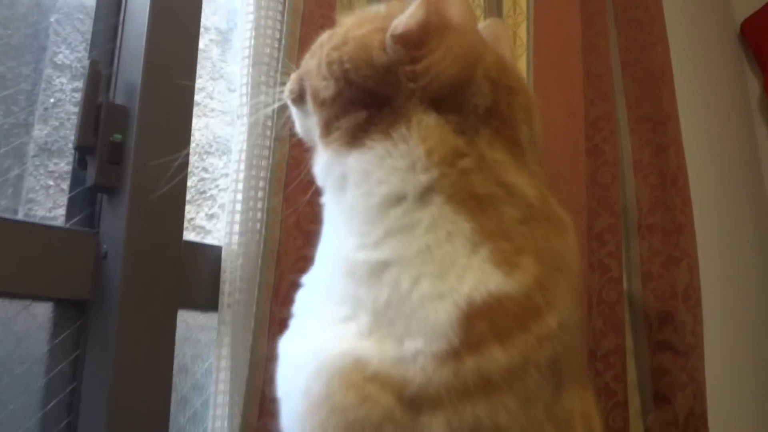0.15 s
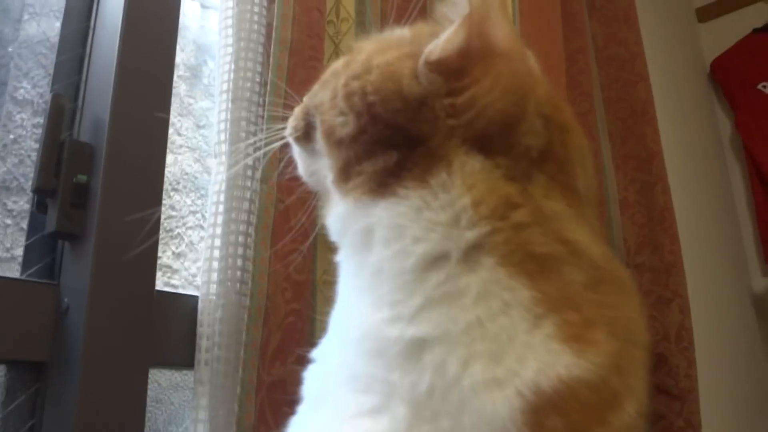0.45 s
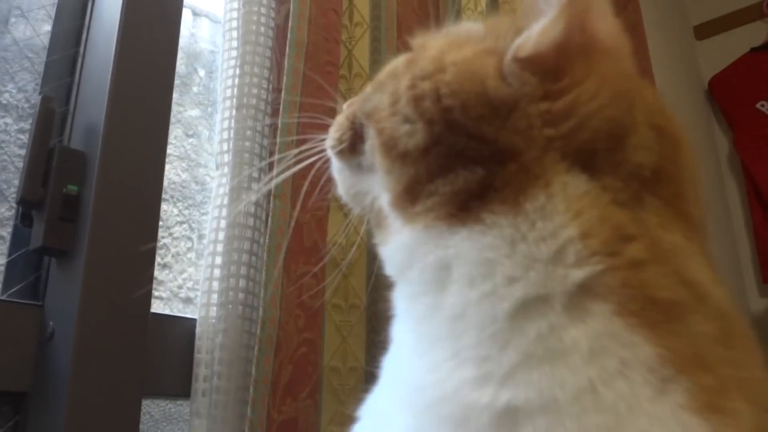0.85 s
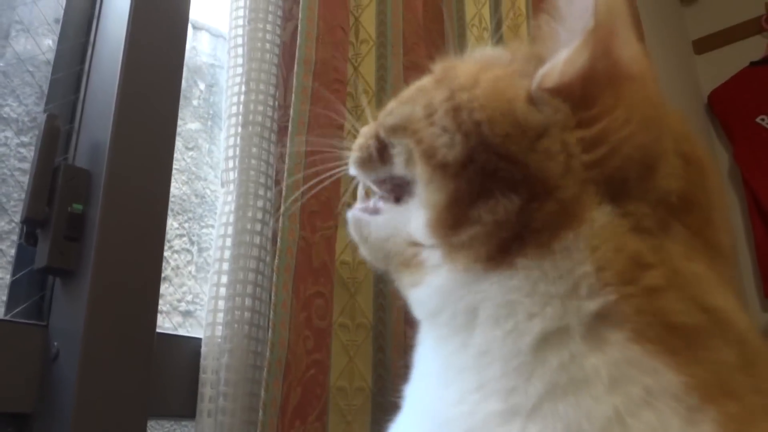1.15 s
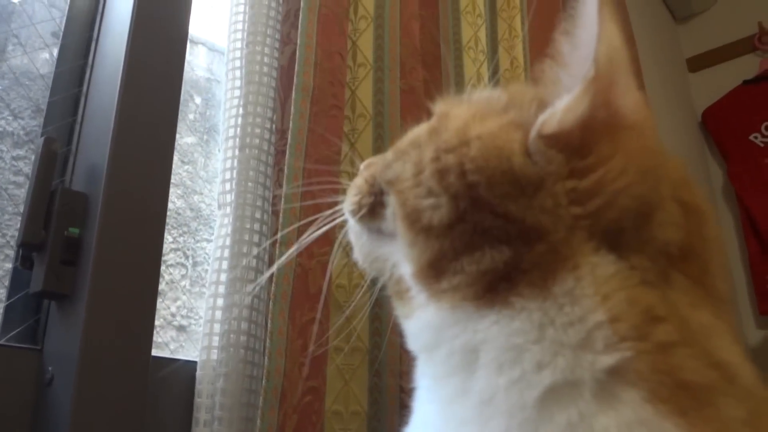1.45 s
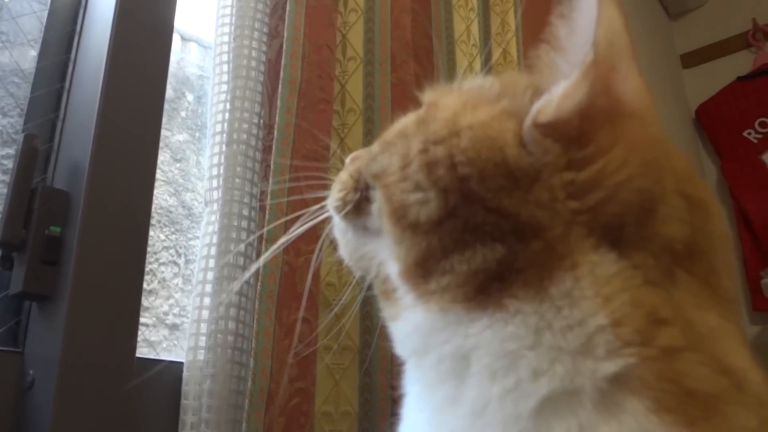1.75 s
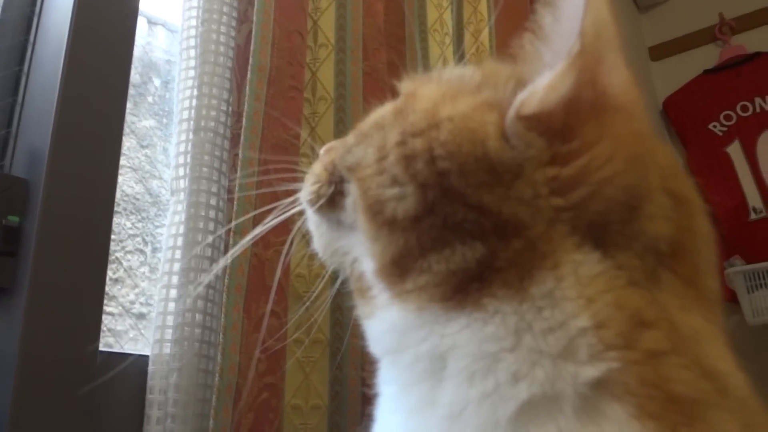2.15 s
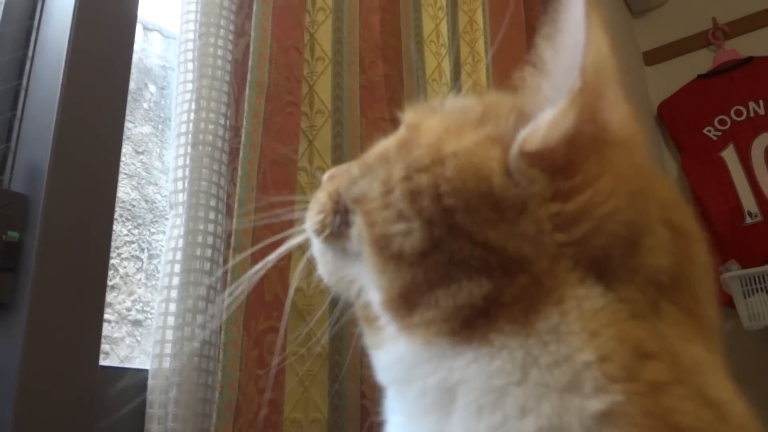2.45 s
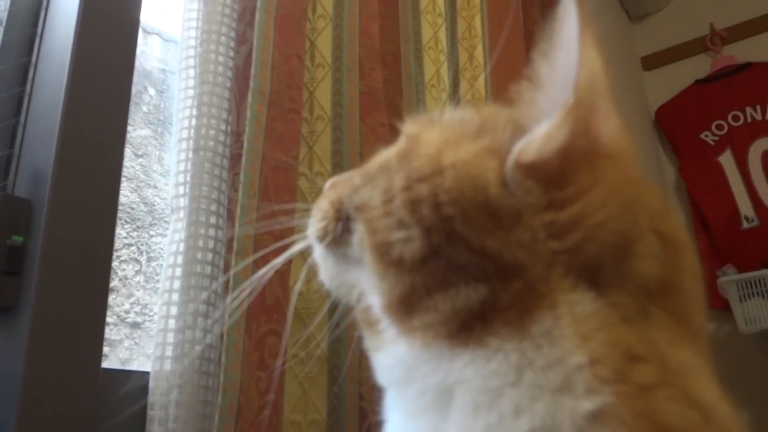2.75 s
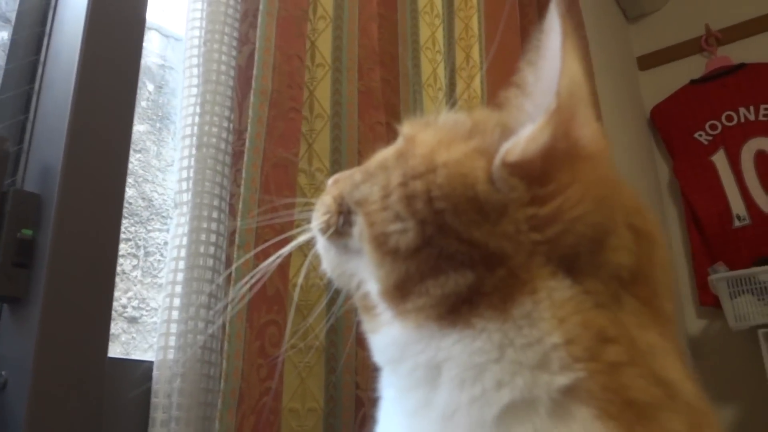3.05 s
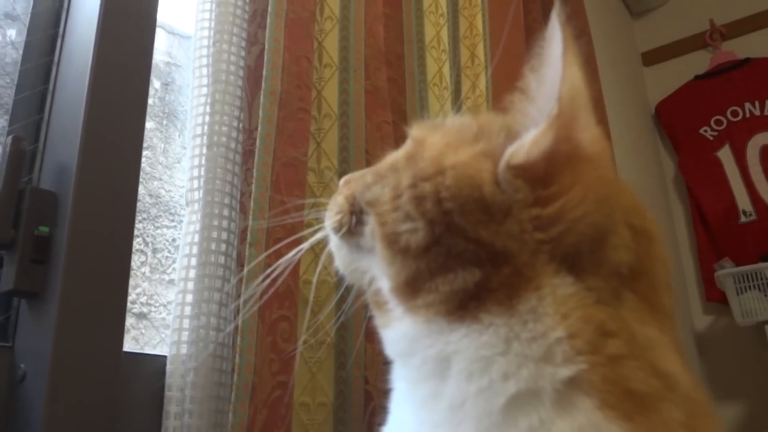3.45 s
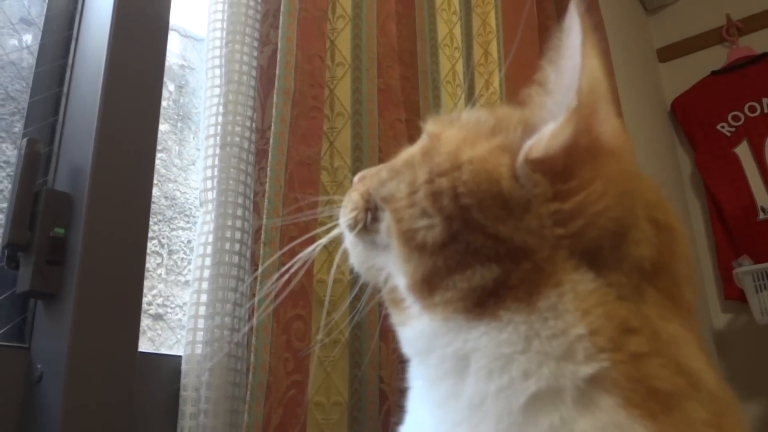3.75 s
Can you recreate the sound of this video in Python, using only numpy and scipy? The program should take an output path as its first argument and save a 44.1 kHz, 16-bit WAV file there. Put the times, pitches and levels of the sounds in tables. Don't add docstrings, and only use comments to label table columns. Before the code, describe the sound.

A cat's single short chirrup, a tenth of a second at about 1.2 s, starts clean, then flutters breathily, with a bright click inside it. Faint wet lip smacks open the clip; small taps follow at 0.15 and 0.4 s. Louder smacks come at 1.5 and 2.2 s, dull wooden knocks at 1.9 and, softer, 2.95 s. A deep thud at 3.55 s and last smack at 3.8 s end it, over steady traffic rumble and faint hiss.

```python
import sys
import numpy as np
from scipy import signal
from scipy.io import wavfile

SR = 44100
rng = np.random.default_rng(int(sys.argv[2]) if len(sys.argv) > 2 else 0)


def unload_wav(signal):
    wavfile.write(
        sys.argv[1],
        SR,
        np.round(np.clip(np.atleast_2d(signal).T, -1, 1) * 32767).astype(np.int16),
    )


def volts(x):
    e = np.asarray(x, float) / 20
    return 10 ** e


N = 171549


def in_time(rows):
    s, *columns = np.transpose(rows)
    return [np.interp(np.arange(N) / SR, s, c) for c in columns]


def at_hz(points, hz):
    table_hz, value = np.transpose(points)
    return np.interp(np.log(hz), np.log(table_hz), value)


def rms_one(x):
    return x / np.sqrt(np.mean(x ** 2) + 1e-20)


def dull(x, hz, order=2):
    return signal.sosfilt(signal.butter(order, hz, fs=SR, output="sos"), x)


def ring(x, hz, t60):
    r = volts(-60 / (t60 * SR))
    w = 2 * np.pi * hz / SR
    return signal.lfilter([0, np.sin(w)], [1, -2 * r * np.cos(w), r * r], x + 1e-18)


def bands(count, low_hz=22):
    warm_up = 4000
    white = rng.standard_normal((2, 2, count + warm_up))
    edges = low_hz * 2 ** (np.arange(29) / 3)
    for k, (low, high) in enumerate(zip(edges, edges[1:])):
        band_pass = signal.butter(2, [low, high], "band", fs=SR, output="sos")
        yield np.sqrt(low * high), signal.sosfilt(band_pass, white[k % 2])[:, warm_up:]


def traffic():
    # frequency in Hz, level in dB per Hz.
    spectrum = [(26, -36), (40, -16.5), (52, -19.5), (150, -13.5), (200, -17), (400, -21.5), (1400, -28.5),
                (3000, -36.5)]
    # time in seconds, level in dB.
    swell = [(0, 2.5), (.5, 2), (1.5, 1), (2.5, 1.6), (3.2, 1.65), (3.89, 1.5)]
    # frequency in Hz, likeness from -1 to 1.
    likeness = [(60, 0.73), (130, 0.89), (290, -0.25), (640, -0.28), (1410, -0.58), (3100, -0.08),
                (6800, -0.013)]
    # time in seconds, level in dB.
    pane_boom = [(0, -53.5), (.15, -62), (.35, -54.5), (.9, -52.5), (1.2, -54), (1.7, -51.5), (1.95, -53),
                 (2.1, -49), (2.3, -56.5), (2.45, -53.5), (3.0, -56.5), (3.7, -51.5), (3.89, -52.5)]
    tyre_hz, tyre_db, tyre_octaves = 874, 6, 0.37
    boom_hz, boom_width_hz = 80, 14
    road_db, left_db = -55.5, -0.3

    road = 0
    for hz, (mid, side) in bands(count=N):
        alike = np.clip(at_hz(likeness, hz), -1, 1)
        treble_loss_db = 9.7 * max(np.log2(hz / 3000), 0)
        tyre_hump_db = tyre_db * np.exp(-(np.log2(hz / tyre_hz) / tyre_octaves) ** 2)
        level = volts(at_hz(spectrum, hz) - treble_loss_db + tyre_hump_db)
        road = road + level * (np.sqrt(1 + alike) * mid + np.sqrt(1 - alike) * side * [[1], [-1]])
    swell_db, = in_time(swell)
    road = volts(road_db + swell_db) * rms_one(road)

    boom_t60 = np.log(1000) / np.pi / boom_width_hz
    mid, side = ring(rng.standard_normal((2, N + SR)), boom_hz, boom_t60)[:, SR:]
    boom = volts(in_time(pane_boom)[0]) * rms_one(mid + 0.073 * side * [[1], [-1]])
    return (road + boom) * volts([[left_db], [-left_db]])


def room(x):
    # frequency in Hz, reverberation time t60 in seconds.
    decay = [(100, 0.44), (500, 0.22), (1500, 0.19), (4000, 0.31), (9000, 0.1)]
    wide_above_hz = 420
    t = np.arange(SR // 2) / SR
    tail = 0
    for hz, pair in bands(count=len(t)):
        side_share = hz / (hz + wide_above_hz)
        tail = tail + pair * [[1], [side_share]] * volts(-60 * t / at_hz(decay, hz))
    tail = tail[0] + 1.13 * tail[1] * [[1], [-1]]
    tail = tail * np.clip(t / 0.0012, 0, 1)
    tail = tail / np.sqrt(np.sum(tail ** 2) / 2)
    return signal.fftconvolve(x[None], tail, axes=1)[:, :N]


def knocks():
    # start in seconds, peak level in dB, contact cut-off in Hz.
    blows = [
        (1.866, -26.5, 3650),
        (2.9493, -30.5, 1670),
    ]
    # frequency in Hz, level in dB, t60 in seconds.
    panel = [(128, -0.5, 0.085), (227.6, -13.5, .18), (303, -5, 0.05), (349, -13, 0.16), (446, -17, 0.21),
             (580, -13, 0.13), (670, -20, 0.028), (843, -9, 0.054), (1100, -6.5, 0.017),
             (1537, -5.5, 0.022)]
    # delay in seconds, level in dB.
    echoes = [(.0031, -4), (.0063, -3.5), (.0075, -3.5), (0.0138, -16), (.0238, -4.5)]
    crack_hz, crack_t60_s, crack_db, crack_lead_s = 2250, 0.0026, 3, 0.00045
    thump_hz, thump_t60_s, thump_db, thump_low_cut_hz = 505, 0.0068, 7, 250
    floor_cut_hz = 130

    out = np.zeros(N)
    for s, db, cut_hz in blows:
        blow = np.zeros(SR)
        blow[0] = volts(db)
        blow = dull(blow + 1e-18, cut_hz)
        late = np.roll(blow, int(crack_lead_s * SR))
        thump = volts(thump_db) * ring(late, thump_hz, thump_t60_s)
        body = thump - volts(crack_db) * ring(blow, crack_hz, crack_t60_s)
        for k, (hz, level_db, t60) in enumerate(panel):
            body += (-1) ** k * volts(level_db) * ring(late, hz, t60)
        reflected = thump - dull(thump, thump_low_cut_hz, order=1)
        for delay_s, echo_db in echoes:
            lag = int(delay_s * SR)
            body[lag:] += volts(echo_db) * reflected[:-lag]
        i = int(s * SR)
        out[i:i + SR] += body[:N - i]
    return out - dull(out, floor_cut_hz, order=1)


def taps():
    # start in seconds, peak level in dB, frequency in Hz, t60 in seconds.
    clicks = [
        (.152, -44.5, 920, 0.0091),
        (.405, -41, 225, 0.045),
        (1.1936, -27, 2040, 0.0045),
        (1.544, -52.5, 1330, 0.027),
        (3.566, -37, 80, 0.19),
    ]
    out = np.zeros(N)
    for s, db, hz, t60 in clicks:
        click = np.zeros(SR // 4)
        click[0] = volts(db)
        i = int(s * SR)
        out[i:i + len(click)] += ring(click, hz, t60)
    return out


def smacks():
    # start in seconds, peak level in dB, cavity frequency in Hz, left over right in dB.
    lip_clicks = [
        (0.0148, -46, 2360, -3),
        (0.049, -56, 2650, -6),
        (0.063, -50, 2390, -16),
        (0.0683, -53, 3270, -18),
        (1.4825, -33, 2370, 4),
        (2.1833, -39.5, 2470, 7),
        (3.5598, -51, 3330, -9),
        (3.8343, -42.5, 2500, 1.0),
    ]
    t60_s, rise_s, level_db = 0.0085, 0.0008, 6
    upper_hz, upper_db, upper_t60_s = 3750, -8, 0.028
    out = np.zeros((2, N))
    t = np.arange(SR // 30) / SR
    shape = (1 - np.exp(-(t / rise_s) ** 2)) * volts(-60 * t / t60_s)
    upper = volts(upper_db) * np.sin(2 * np.pi * upper_hz * t) * volts(-60 * t / upper_t60_s)
    for s, db, hz, pan_db in lip_clicks:
        tone = -np.sin(2 * np.pi * hz * t) - upper
        i = int(s * SR)
        out[:, i:i + len(t)] += volts(db + level_db) * shape * tone * volts([[pan_db / 2], [-pan_db / 2]])
    return out


def chirrup():
    # time in seconds, pitch in Hz, level in dB, mouth opening 0-1, roughness 0-1.
    call = [
        (1.1598, 887, -47.5, 0., 0.),
        (1.168, 880, -36, 0.14, 0),
        (1.173, 777, -34.5, 1, 0.13),
        (1.183, 772, -36.5, 1., 0.4),
        (1.187, 791, -42.5, 1., 0.65),
        (1.199, 784.5, -32, 0.72, 0.26),
        (1.205, 761, -58, 0.8, 1.1),
        (1.236, 740, -56.5, 0.08, 0.7),
        (1.256, 700, -72, 0., 0.45),
    ]
    # frequency in Hz, level in dB before this weighting.
    shut = [(600, 6.5), (900, 0.5), (1700, -2), (2600, -4.5), (3500, -5), (4400, -22), (8000, -25)]
    wide_open = [(800, -14), (1550, 0.), (2330, 3), (3100, 0.), (3900, -5), (4650, -17), (5450, -8),
                 (6200, -22)]
    # frequency in Hz, level in dB.
    air_colour = [(600, 4), (1400, -1.5), (2200, -3), (3400, 2), (4400, -13.5), (6800, -19), (10000, -32)]
    flutter_hz, flutter_depth, puff_db = 407, 0.67, 3.5

    on = slice(int(call[0][0] * SR), int(call[-1][0] * SR))
    hz, db, opening, rough = [column[on] for column in in_time(call)]
    opening, rough = np.clip(opening, 0, 1), np.clip(rough, 0, 1)
    phase = 2 * np.pi * np.cumsum(hz) / SR
    noise = rng.standard_normal((26, 4000 + SR // 5))
    wobble = dull(noise, flutter_hz)[:, 4000:4000 + len(hz)]
    wobble = wobble / wobble.std()

    voice, air = 0, 0
    for k in range(1, 13):
        colour = volts((3 - opening) * at_hz(shut, k * hz) + opening * at_hz(wide_open, k * hz))
        flutter = 1 - 0.48 * rough + flutter_depth * rough * 0.5 * wobble[k]
        voice = voice + colour * np.sin(k * phase) * flutter
        between = k + 0.5
        air = air + volts(at_hz(air_colour, between * hz)) * np.sin(between * phase) * wobble[13 + k]
    out = np.zeros(N)
    out[on] = volts(db) * (voice + volts(puff_db) * rough ** 2 * air)
    return out


def scene():
    cat, lips, wood = chirrup() + taps(), smacks(), knocks()
    cat_wet_db, smack_wet_db, knock_wet_db = -6.5, -22, -4
    wet = room(volts(cat_wet_db) * cat + volts(smack_wet_db) * lips.mean(axis=0) + volts(knock_wet_db) * wood)
    knock_pan_db, left_cut_hz = -1, 1300
    left = volts(knock_pan_db / 2) * dull(wood, left_cut_hz, order=1)
    right = volts(-knock_pan_db / 2) * wood
    return cat * volts([[-0.3], [0.3]]) + lips + np.array([left, right]) + wet + traffic()


def band_limit(x):
    return signal.sosfilt(signal.butter(12, 15800, fs=SR, output="sos"), x)


def record(dry):
    mid, side = rng.standard_normal((2, N))
    mid_hiss = volts(-64.5) * dull(mid, 10700, order=1)
    side_hiss = volts(-69) * dull(side, 5300, order=2) * [[1], [-1]]
    top_cut = signal.cheby2(14, 60, 16150, fs=SR, output="sos")
    return band_limit(signal.sosfilt(top_cut, dry + mid_hiss + side_hiss))


dry = scene()
out = record(dry)
unload_wav(out)
```